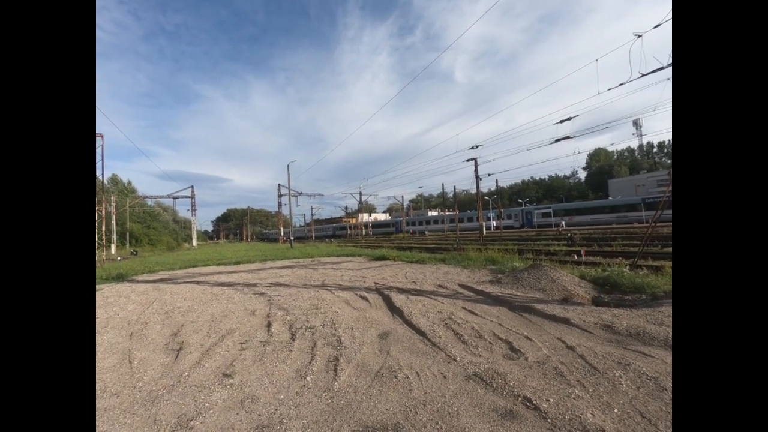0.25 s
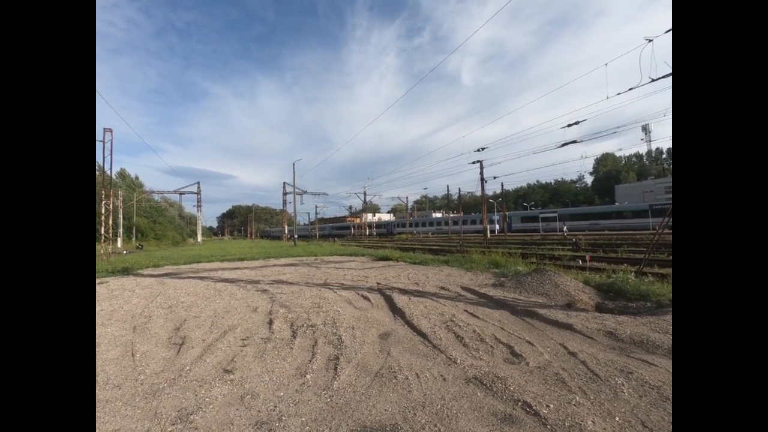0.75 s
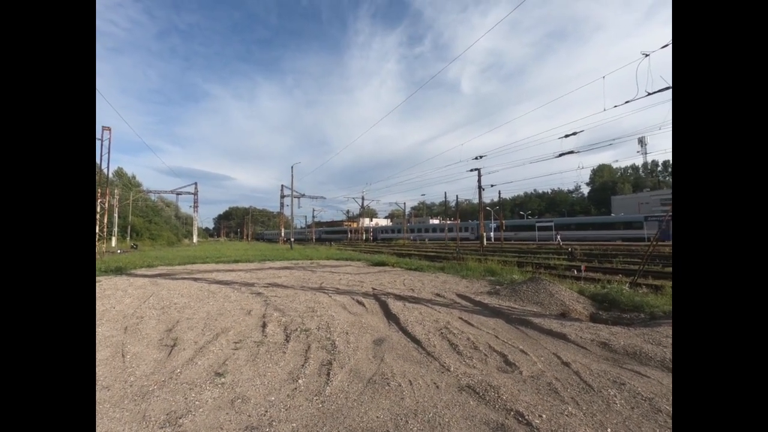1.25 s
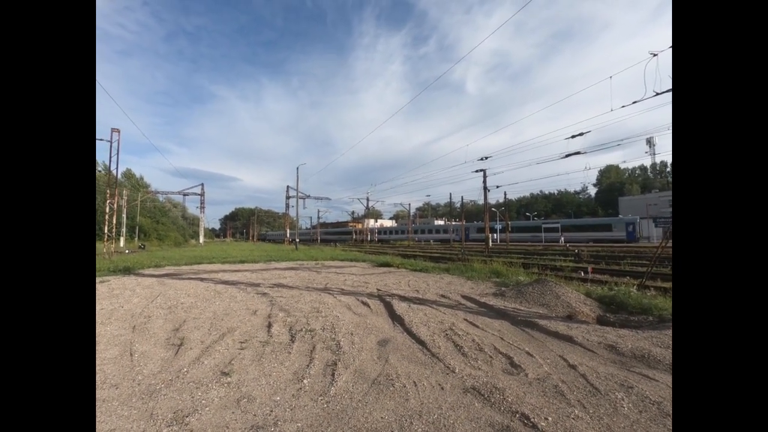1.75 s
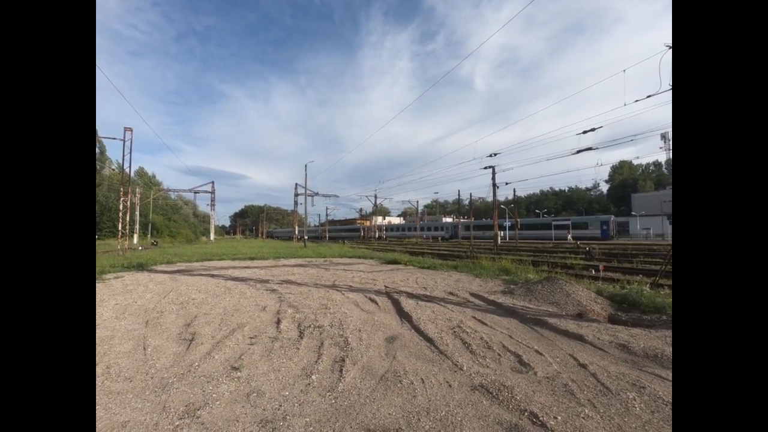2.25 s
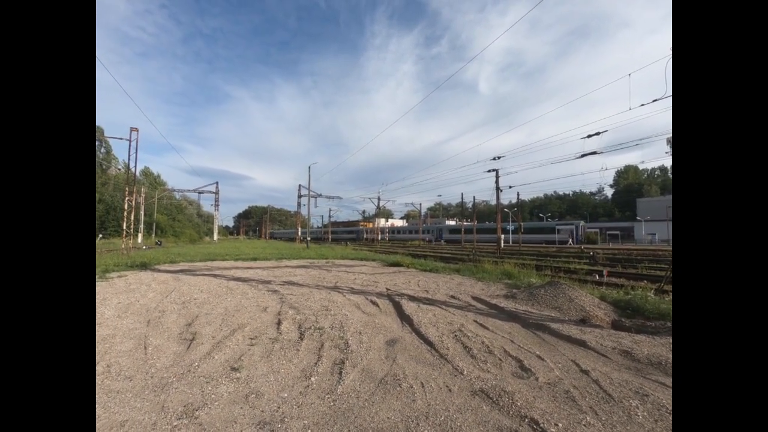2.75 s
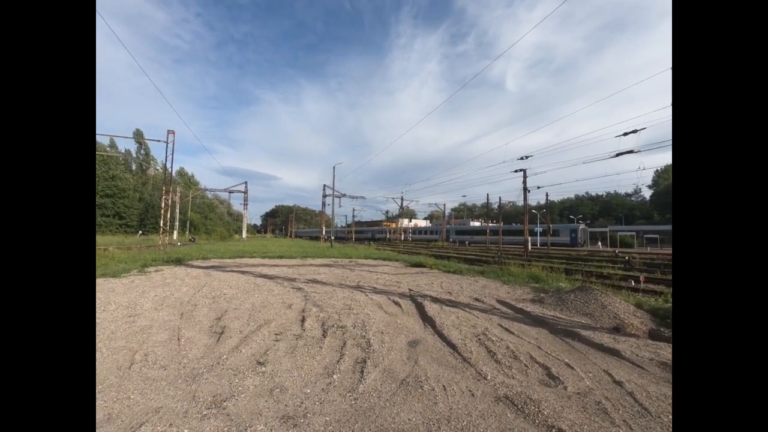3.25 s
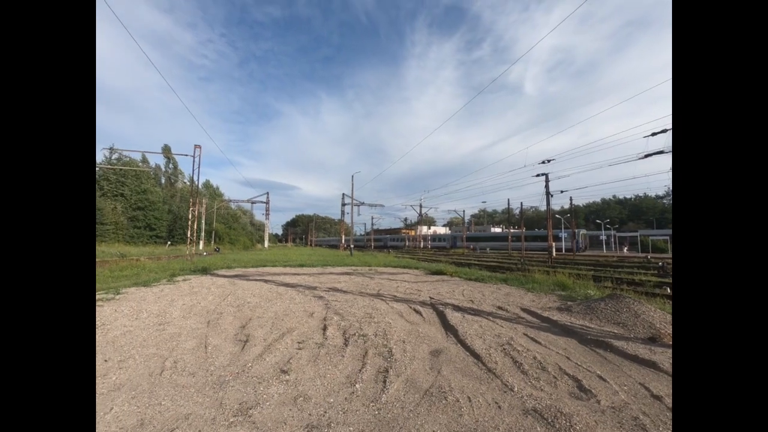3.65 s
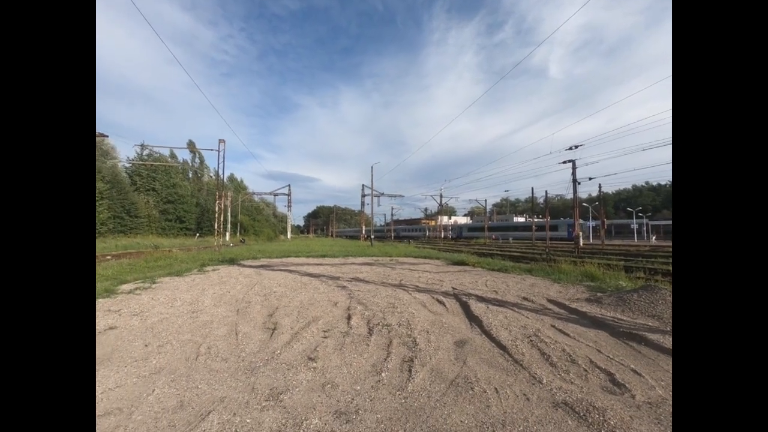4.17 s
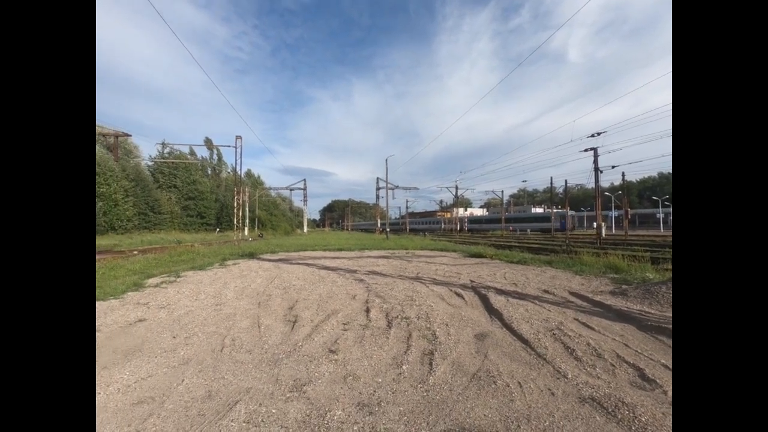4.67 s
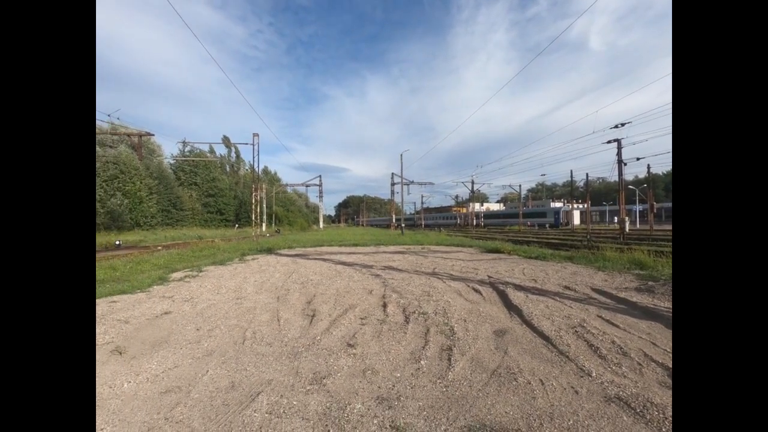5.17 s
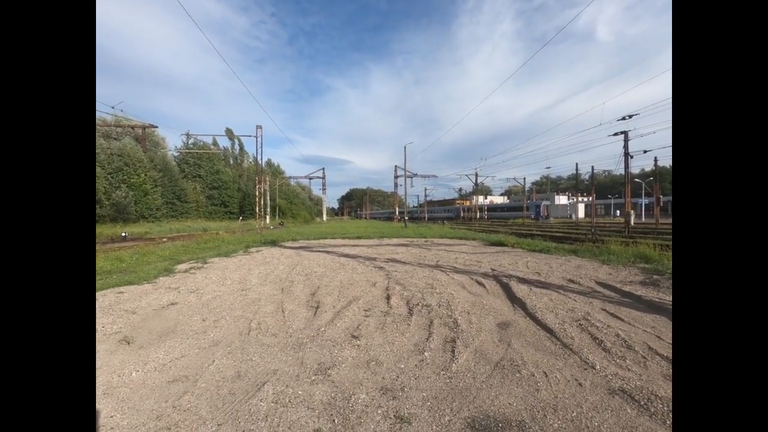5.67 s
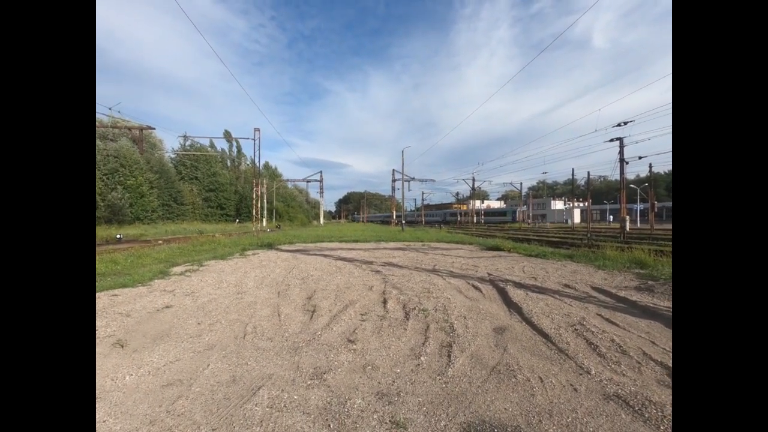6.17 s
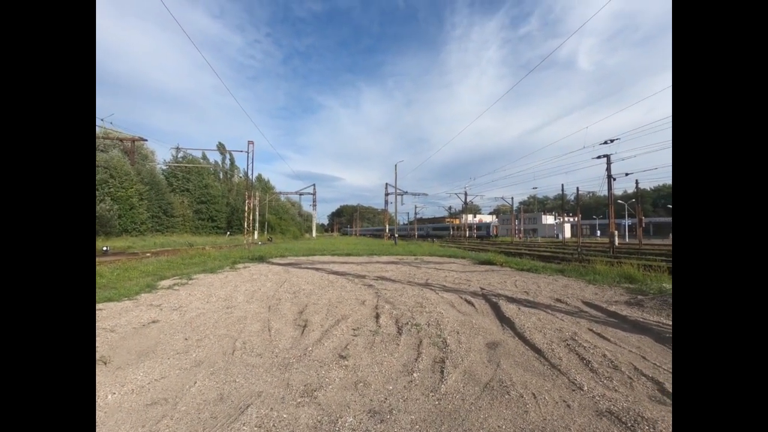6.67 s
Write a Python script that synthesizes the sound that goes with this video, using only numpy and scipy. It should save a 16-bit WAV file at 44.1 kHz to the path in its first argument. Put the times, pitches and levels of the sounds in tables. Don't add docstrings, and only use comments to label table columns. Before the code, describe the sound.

Low wind thumps over a faint far train: steady steel rolling, motor hum, joint knocks, then bright flange squeals and a loud click on the camera.

```python
import sys
import numpy as np
from scipy import signal
from scipy.fft import rfft, irfft, next_fast_len
from scipy.io import wavfile
from scipy.ndimage import map_coordinates

SR = 44100
rng = np.random.default_rng(int(sys.argv[2]) if len(sys.argv) > 2 else 0)


def master(y):
    cut = np.clip(np.atleast_2d(y).T, -1, 1)
    pcm = np.round(cut * 32767)
    wavfile.write(sys.argv[1], SR, pcm.astype(np.int16))


def linear_from_db(decibels):
    return 10 ** (np.asarray(decibels, float) / 20)


N = 305172


def unit(x):
    return x / np.sqrt(np.mean(x ** 2) + 1e-20)


def along(points, hz):
    f, *cols = np.transpose(points)
    return np.squeeze([np.interp(np.log(hz + 1), np.log(f + 1), c) for c in cols])


def curves(rows):
    s, *cols = np.vstack(rows).T
    return [np.interp(np.arange(N) / SR, s, c) for c in cols]


def span(start_s, held_s, attack_s):
    t = np.arange(N) / SR - start_s
    return np.maximum(t, 0), np.clip(t / attack_s, 0, 1), np.maximum(t - held_s, 0)


def wobble(rate_hz, size=N):
    knots = N * rate_hz / SR
    coarse = map_coordinates(rng.standard_normal(int(knots) + 4), [np.linspace(0, knots, 5000)])
    return np.interp(np.linspace(0, 4999, size), np.arange(5000), coarse)


def filtered(x, response):
    m = next_fast_len(N + SR // 2)
    return irfft(rfft(x, m) * response(np.fft.rfftfreq(m, 1 / SR)), m)[..., :N]


def noise(spectrum):
    return unit(filtered(rng.standard_normal((2, N)), lambda hz: linear_from_db(along(spectrum, hz))))


def tone(hz, drift):
    return 2 * np.pi * np.cumsum(hz * (1 + drift * wobble(25.1))) / SR


# f/Hz, width/Hz, rolling level/dB, rubbing level/dB
WHEEL_MODES = [(832, 385, 0, -37.5), (1578, 410, -0.5, -19.5), (2300, 370, 0, -5.5), (2766, 24, 4.5, -9.5),
               (3291, 147, -3, -2.5), (4137, 43, -23, 1), (5080, 24, -26, -3.5), (5780, 25, -8, -5),
               (6010, 200, -21, -4), (6820, 310, -14, -7.5), (7760, 80, -29, -3.5), (8760, 150, -58, -14),
               (9700, 71, -47, -14.5), (10000, 170, -51, -31), (13350, 200, -80, -27.5)]


def singing(levels_db, between, between_db, flicker_db, rate_hz):
    hz, t, z = signal.stft(rng.standard_normal((2, N)), SR, nperseg=2048, noverlap=1536)
    power = linear_from_db(2 * (along(between, hz) + between_db))[:, None] * np.ones(len(t))
    for (centre_hz, width_hz, *_), db in zip(WHEEL_MODES, levels_db):
        shape = 1 / (1 + (2 * (hz - centre_hz) / width_hz) ** 2) ** 2
        swell_db = flicker_db * wobble(rate_hz, size=len(t))
        power += np.outer(shape, linear_from_db(2.76 * (db + swell_db)))
    return signal.istft(z * np.sqrt(power), SR, nperseg=2048, noverlap=1536)[1][:, :N]


# t/s, rolling level/dB
NEARNESS = [(0.0, -50), (0.17, -52.5), (1.58, -55), (2.1, -54), (2.68, -54), (2.95, -52.5), (3.39, -55),
            (4.28, -55.5), (4.61, -57), (5.05, -52.5), (5.2, -58), (5.49, -60.5), (6.69, -58.5),
            (6.92, -53.5)]
# f/Hz, density/(dB per Hz)
RAIL_BED = [(260, -7), (450, -3.5), (520, -11.5), (650, -9), (850, -14), (1120, -9), (1610, -10),
            (2270, -9), (3290, -5.5), (4830, -20), (7570, -19.5), (9000, -34.5), (10700, -41),
            (14500, -71.5)]
# f/Hz, density/(dB per Hz)
RUMBLE_COLOUR = [(44, -35), (75, 0), (155, -0.5), (182, -7.5), (243, -8), (351, -20.5), (419, -20),
                 (700, -49), (910, -88), (1540, -120)]
RUMBLE_DB, RUMBLE_GROWS, ROAR_DB, HISS_DB = -37.5, 1, 0, -1.5


def rolling():
    near_db, = curves(NEARNESS)
    steel = singing([row[2] for row in WHEEL_MODES], RAIL_BED, between_db=3, flicker_db=.9, rate_hz=9)
    roar = filtered(steel, lambda hz: 1 / (1 + (hz / 1900) ** 6))
    swell_db = near_db + 0.55 * wobble(9)
    rumble_db = RUMBLE_DB + RUMBLE_GROWS * (near_db - near_db.mean()) + 1.3 * wobble(6.5)
    rumble = linear_from_db(rumble_db) * noise(RUMBLE_COLOUR)
    return rumble + linear_from_db(ROAR_DB + swell_db) * unit(roar) + linear_from_db(HISS_DB + swell_db) * unit(steel - roar)


# t/s, hum level/dB
EFFORT = [(0, -36), (.3, -45), (.55, -37), (.8, -56), (1.4, -47), (1.65, -41.5), (2.25, -41), (2.4, -36.5),
          (2.9, -33), (3.17, -37), (3.25, -48.5), (3.6, -65)]
# f/Hz, level/dB
GEAR_TONES = [(419.3, -56), (438, -60.5)]
HUM_HZ, HUM_RISE_HZ_PER_S = 145.5, 4.2
HUM_SECOND_DB, HUM_SECOND_FADE_DB_PER_S = -49, 3
GEAR_SAG_HZ_PER_S, GEAR_FADE_DB_PER_S, GEAR_OFF_S = 2.5, .5, 3.26
WHISTLE_HZ, WHISTLE_SECOND_DB = 3666, -9
WHISTLE_DB, WHISTLE_HOLD_S, WHISTLE_FADE_DB_PER_S = -62.5, .3, 4


def motors():
    t = np.arange(N) / SR
    since_off = np.maximum(t - GEAR_OFF_S, 0)
    hum_db, = curves(EFFORT)
    hum_second_db = HUM_SECOND_DB - HUM_SECOND_FADE_DB_PER_S * t - 30 * since_off
    whistle_db = WHISTLE_DB - WHISTLE_FADE_DB_PER_S * np.maximum(t - WHISTLE_HOLD_S, 0)
    whistle_second_db = whistle_db + WHISTLE_SECOND_DB - 30 * np.maximum(t - .9, 0)
    hum = (HUM_HZ + HUM_RISE_HZ_PER_S * t, .003, hum_db, hum_second_db)
    whistle = (WHISTLE_HZ, .0016, whistle_db, whistle_second_db)
    out = np.zeros(N)
    for hz, drift, *levels_db in (hum, whistle):
        phase = tone(hz, drift)
        for order, db in enumerate(levels_db, 1):
            swell_db = (1.3 + 1.2 * (order - 1)) * wobble(8)
            out += linear_from_db(db + 2.5 + swell_db) * np.sin(order * phase)
    gear_db = -GEAR_FADE_DB_PER_S * t - 120 * since_off
    for hz, db in GEAR_TONES:
        level = linear_from_db(db + gear_db + 3 + 2.2 * wobble(6))
        out += level * np.sin(tone(hz - GEAR_SAG_HZ_PER_S * t, .004))
    return out


# t/s, strength/dB, left against right/dB
WIND_STRENGTH = [
    [(0.0, -27.5, -8), (0.22, -30, -7), (0.62, -31.5, -12), (0.71, -31, -19), (0.94, -31, -11.5),
     (2.75, -29.5, -6), (3.39, -26.5, -16), (3.52, -32, -9.5), (4.28, -24, -5.5), (4.42, -30.5, -6.5),
     (5.15, -17.5, -11.5), (5.21, -20.5, -22), (5.49, -22, -14), (5.55, -22, -7.5)],
    [(5.62, -29.5, -7), (5.724, -21.5, -11), (5.88, -31.5, -9), (6.92, -21.5, -2.5)],
]
# f/Hz, density/(dB per Hz)
BUFFET_COLOUR = [(30, -4), (50, 1.5), (80, -2), (120, -5.5), (200, -26), (400, -83.5)]
# f/Hz, density/(dB per Hz)
HEAVE_COLOUR = [(2, -30), (9, 15.5), (18, 21), (40, 11), (60, 16.5), (100, -60)]
# f/Hz, density/(dB per Hz)
FLUTTER_COLOUR = [(60, 5.5), (150, 6), (250, 5), (400, -8), (700, -24), (1200, -81.5)]
# t/s, half width/s, level/dB
FLUTTER_GUSTS = [(2.1, 0.19, -35), (5.19, 0.048, -28), (5.263, 0.013, -28), (5.41, 0.069, -32),
                 (6.48, 0.051, -45), (6.92, 0.055, -36)]
# t/s, peak level/dB, f/Hz
PORT_EDDIES = [
    [(.12, -14.5, 110), (.163, -15, 74), (.21, -14, 86.4), (.238, -13, 87.5), (.27, -16, 60),
     (.35, -18, 35.8), (.387, -15.5, 36.4), (.703, -17.5, 29.5), (.78, -18, 33.4), (1.478, -19, 97.5),
     (1.55, -20.5, 40), (4.87, -14, 34), (4.95, -14, 42.2), (5.08, -14.5, 29.3), (5.162, -21.5, 485),
     (5.166, -13, 149), (5.181, -16, 330), (5.191, -23, 276), (5.263, -14.5, 60), (5.136, -25, 300),
     (5.161, -30, 800), (5.214, -21, 260), (5.244, -27, 270), (5.263, -22, 380), (5.289, -28, 260),
     (5.347, -28, 330), (5.381, -24, 300), (5.388, -33, 600), (5.431, -27, 330), (5.46, -27, 250),
     (5.49, -29, 230), (5.3, -28, 220), (5.338, -25, 295), (5.385, -26, 335), (5.414, -16, 300),
     (5.731, -37, 108), (6.34, -29, 180), (6.42, -31, 170), (2.2, -30, 205), (2.3, -30, 200),
     (5.545, -27, 240), (6.571, -22, 198), (6.568, -29, 574), (6.73, -24.5, 194)],
    [(6.255, -27, 110), (6.298, -22, 110), (6.512, -24, 199), (6.535, -27, 190), (6.59, -25, 168),
     (6.87, -19.5, 201), (6.895, -31, 397), (5.172, -28, 400), (5.198, -28, 300), (5.27, -32, 300),
     (5.345, -33, 320), (5.405, -28, 350), (6.495, -24, 195), (6.44, -31, 200), (6.57, -37, 800),
     (6.8, -24, 160), (6.885, -20, 160), (6.91, -22, 170)],
]
# t/s, peak level/dB, f/Hz
LOW_PORT_EDDIES = [
    [(0.501, -22, 70.4), (0.864, -19, 49), (1.137, -26.5, 73), (1.85, -21.5, 98), (2.189, -24, 75),
     (2.406, -14.5, 99), (2.783, -17.5, 86.5), (2.853, -21.5, 96), (2.939, -18.5, 113), (3.042, -22.4, 80),
     (3.099, -28, 54), (3.216, -23.5, 60), (3.292, -19.2, 43), (3.356, -17, 57), (3.434, -21, 70),
     (3.648, -21, 82), (3.736, -21.6, 59.4), (3.855, -27, 55), (3.936, -16.5, 69), (4.19, -24, 52),
     (4.246, -14.5, 94), (4.559, -21.5, 76.6), (4.615, -18, 62), (4.758, -18, 81), (4.983, -18, 55),
     (5.316, -19, 54.5), (5.382, -20, 102), (5.434, -15.5, 65), (5.494, -20, 54.7), (5.673, -24, 66),
     (5.729, -17, 69), (6.245, -23.5, 70.5), (6.343, -20, 63), (6.417, -21.5, 49.7), (6.513, -31, 69),
     (6.579, -18.5, 88), (6.686, -15, 52), (6.751, -13, 66), (6.827, -19.5, 49), (6.879, -19, 64)],
    [(0.085, -33, 106), (2.07, -38, 83), (2.293, -34, 121), (3.333, -26, 110), (5.028, -21, 49),
     (5.441, -27.5, 46), (5.646, -29, 81), (5.812, -28, 80.6), (5.864, -31, 83), (5.931, -26, 104),
     (6.105, -30.3, 87.6), (6.503, -20, 101), (6.595, -20.5, 132), (6.66, -15, 109), (6.765, -19, 100),
     (6.896, -12.5, 133)],
]
BUFFET_DB, HEAVE_DB, FLUTTER_DB = 0, -4, -25.5
DEEP_HZ, DEEP_LEFT_DB = 55, -14


def wind():
    level_db, pan_db = curves(WIND_STRENGTH)
    share = linear_from_db([np.clip(1.6 * (pan_db + 3), -30, 6), -np.clip(pan_db + 3, 0, 20)])
    lumps = linear_from_db(2.2 * np.array([wobble(11), wobble(9)]))
    seconds = np.arange(N) / SR
    gusts = sum(linear_from_db(db) * np.exp(-((seconds - s) / width_s) ** 2) for s, width_s, db in FLUTTER_GUSTS)
    gusty = (linear_from_db(level_db + FLUTTER_DB) + gusts) * linear_from_db(3 * wobble(45))
    air = linear_from_db(level_db + BUFFET_DB) * unit(lumps * noise(BUFFET_COLOUR))
    air = air + linear_from_db(level_db + HEAVE_DB) * noise(HEAVE_COLOUR)
    air = air + gusty * noise(FLUTTER_COLOUR)
    deep = filtered(air, lambda hz: 1 / (1 + (hz / DEEP_HZ) ** 6))
    deep_share = np.minimum(share, linear_from_db([[DEEP_LEFT_DB], [0]]))
    air = np.pad(share * (air - deep) + deep_share * deep, ((0, 0), (0, 2000)))
    t = np.arange(-2000, 2000) / SR
    for port, rows in zip((1, 0, 1, 0), PORT_EDDIES + LOW_PORT_EDDIES):
        for s, db, hz in rows:
            u = 2 * np.pi * hz * t
            pulse = (1 - u - u ** 2 / 2) * np.exp(-u ** 2 / 5)
            air[port, round(s * SR) - 2000:][:len(t)] += linear_from_db(db) * pulse
    return air[:, :N]


def leak(air):
    def crossing(hz):
        return 0.19 / (1 + (hz / 200) ** 4) - 0.2 / (1 + (260 / (hz + 1)) ** 4)
    across = filtered(air[::-1], crossing)
    return filtered(air + across, lambda hz: 1j * hz / (4 + 1j * hz))


# t/s, held/s, level/dB
TOP_HISSES = [
    (3.83, .2, -82),
    (4.68, .45, -79),
    (6.82, .2, -83),
    (0, .2, -92),
    (3.02, .2, -93),
]


def air_hiss():
    gain = 0
    for start_s, held_s, db in TOP_HISSES:
        _, rise, after = span(start_s, held_s, .03)
        gain = gain + rise * linear_from_db(db - 70 * after)
    return gain * noise([(10400, -60), (11000, 0), (13000, -4), (14500, -9), (15200, -60)])


# t/s, held/s, level/dB, fade/(dB per s)
FLANGE_RUBS = [(.08, 0.044, -58.5, 61), (1.95, .04, -63, 81), (2.1, 0.043, -62.5, 67),
               (2.25, 0.039, -64, 62), (2.39, 0.037, -59, 118), (2.82, 0.2, -54.5, 23),
               (3.66, 0.057, -62, 75), (3.813, 0.37, -49, 29.5), (4.669, 0.49, -51, 30.5),
               (5.3, 0.41, -67, 310), (5.735, 0.12, -57.5, 31), (5.9, 0.43, -61.5, 51),
               (6.745, .3, -53, 50)]
# f/Hz, density/(dB per Hz)
RUB_BED = [(1800, -20), (3000, -4), (4000, -7), (5500, -7), (7800, -6.5), (8400, -12), (10800, -24),
           (11100, -41), (12800, -45), (13700, -34.5), (15000, -67)]
RUB_ATTACK_S, RUB_SAG_DB_PER_S = 0.048, 4
GRAZE_DB = -8.5
TOP_DB, TOP_GROWS = -7.5, 0.99


def flanges():
    power = linear_from_db(2 * (curves(NEARNESS)[0] + GRAZE_DB))
    for start_s, held_s, db, fade in FLANGE_RUBS:
        since, rise, after = span(start_s, held_s, RUB_ATTACK_S)
        rub_db = db - RUB_SAG_DB_PER_S * np.minimum(since, held_s) - fade * after
        power = power + (rise * linear_from_db(rub_db)) ** 2
    level_db = 10 * np.log10(power)
    steel = singing([row[3] for row in WHEEL_MODES], RUB_BED, between_db=-6, flicker_db=1.5, rate_hz=10)
    top = filtered(steel, lambda hz: 1 / (1 + (8300 / (hz + 1)) ** 12))
    grip = linear_from_db(level_db - 1 + .9 * np.minimum(level_db + 59, 0) + 1.2 * wobble(120))
    return grip * (unit(steel - top) + linear_from_db(TOP_DB + TOP_GROWS * (level_db + 50.5)) * unit(top))


# t/s, peak level/dB, loudest mode f/Hz, t60/s, thud level/dB
RAIL_JOINTS = [
    (.088, -36, 3320, .06, -34),
    (1.415, -48, 4200, .03, -44),
    (1.962, -41, 3150, .07, -42),
    (2.103, -41, 754, .13, -36),
    (2.155, -45, 2320, .06, -48),
    (2.258, -46, 3194, .12, -24),
    (2.396, -35, 2800, .055, -17),
    (3.135, -44, 2770, .05, -30),
    (4.97, -47, 2300, .08, -50),
]


def joints():
    out, t = np.zeros(N + SR), np.arange(SR // 3) / SR
    modes = np.array(WHEEL_MODES)
    hz, width_hz, roll_db, rub_db = (modes[:, i:i + 1] for i in range(4))
    highpass = signal.butter(3, 4200, fs=SR, output='sos')
    for s, db, loud_hz, t60_s, thud_db in RAIL_JOINTS:
        chance = rng.standard_normal((2, len(modes), 1))
        levels_db = np.maximum(roll_db, rub_db - 10) - 8 + 6 * np.log10(width_hz / 250) + 3 * chance[0]
        ring = np.sum(linear_from_db(levels_db) * np.sin(2 * np.pi * hz * (1 + 0.0058 * chance[1]) * t), 0)
        crack = signal.sosfilt(highpass, rng.standard_normal(len(t)))
        ring += 1.05 * np.sin(2 * np.pi * loud_hz * t + .1 * np.cumsum(crack)) + 1.8 * crack
        thud = linear_from_db(thud_db - 60 * t / 0.11) * np.sin(2 * np.pi * 120 * t)
        knock = (linear_from_db(db - 60 * t / t60_s) * ring + thud) * (1 - np.exp(-t / 0.005))
        out[round(s * SR):][:len(t)] += knock
    return out[:N]


# t/s, held/s, f/Hz, level/dB
LONE_MODES = [(4.3, 0.07, 4235, -57.5), (4.4, 0.068, 4235, -70), (4.355, .05, 2172, -54),
              (4.42, .05, 2172, -65), (3.85, 0.11, 5975, -61), (2.97, .27, 4170, -66),
              (2.95, .1, 7741, -64), (5.77, 0.46, 7760, -66), (6.0, 0.49, 3290, -65), (.3, .55, 7327, -71),
              (0.087, 0.32, 1580, -59), (6.78, .14, 6800, -61), (3.6, .3, 3500, -70),
              (6.79, .13, 5090, -63), (6.84, .08, 4180, -56), (2.9, .4, 6850, -67), (4.84, .3, 7747, -61),
              (3.88, .35, 13281, -78), (.9, .8, 3666, -70.5)]
# t/s, held/s, f/Hz, level/dB
ROUGH_RINGS = [(.09, .03, 2770, -57), (.09, .03, 2300, -57), (2.1, .07, 2300, -55), (2.115, .03, 2720, -57),
               (2.262, .035, 3170, -56), (2.265, .04, 2740, -59), (2.425, .008, 2790, -52),
               (2.86, .14, 10400, -77), (2.86, .14, 13600, -89), (5.59, .08, 6950, -73),
               (5.59, .05, 4200, -72), (6.12, .14, 5720, -69), (6.82, .1, 8400, -68), (6.8, .12, 6550, -63),
               (4.15, .08, 7780, -59), (3.86, .08, 6000, -55), (3.97, .07, 7800, -58),
               (3.92, .08, 4170, -60), (3.85, .12, 3290, -59), (1.96, .02, 3950, -58),
               (2.268, .03, 3450, -58), (2.398, .015, 2790, -49), (.09, .03, 3300, -55),
               (3.9, .15, 14000, -86), (6.77, .15, 3290, -58), (5.8, .18, 3290, -66), (4.72, .2, 3290, -61),
               (4.95, .2, 3290, -62), (5.2, .2, 4200, -68), (5.4, .15, 4200, -71), (4.75, .2, 5720, -65),
               (5.0, .2, 5720, -65), (5.1, .2, 6950, -69), (5.35, .15, 6950, -75), (2.92, .12, 6850, -66),
               (3.86, .15, 6900, -65), (6.38, .12, 6900, -73), (5.2, .15, 7790, -68),
               (2.15, .03, 2300, -57)]
# rise/s, fade/(dB per s), waver/Hz, waver rate/Hz
ROUGHNESS = (.006, 600, 70, 150)
CHIRP_RISE_S, CHIRP_FADE_DB_PER_S = 0.022, 250


def chirps(rows, rise_s, fade_db_per_s, waver_hz, rate_hz):
    out = np.zeros(N + SR)
    for start_s, held_s, hz, db in rows:
        t = np.arange(round((held_s + .2) * SR)) / SR
        knots = rng.standard_normal((2, 60))
        waver, swell = (np.interp(t * rate_hz, np.arange(60), k) for k in knots)
        level_db = db + 3 - fade_db_per_s * np.maximum(t - held_s, 0) + 2.5 * swell
        phase = 2 * np.pi * np.cumsum(hz + waver_hz * waver) / SR
        out[round(start_s * SR):][:len(t)] += np.minimum(t / rise_s, 1) * linear_from_db(level_db) * np.sin(phase)
    return out[:N]


# start t/s, end t/s, level/dB, favoured f/Hz, loss/(dB per octave away)
WHEEL_SQUEALS = [
    (2.9, 3.062, -65, 6200, 6),
    (3.839, 3.987, -58, 5460, 7),
    (4.03, 4.17, -55.5, 10200, 24),
    (4.278, 4.38, -70, 3300, 40),
    (4.38, 4.62, -77, 6000, 58),
    (4.717, 5.184, -64, 6600, 10),
    (5.249, 5.637, -74, 4870, 9),
    (6.02, 6.44, -70, 6360, 27),
    (6.801, 6.923, -60, 4000, 8),
]
# f/Hz, level/dB
LOCKED_MODES = [(3283, -9), (4150, 0), (5090, -10), (5725, -12), (6015, 0), (6890, -7), (7770, -1),
                (10718, -12), (13290, -24)]
WHEEL_PITCH = [.99, 1, 1.001, 1.02, 1.01, 1, 1.008, 1.002, .999]


def squeals():
    out = np.zeros(N)
    hz, mode_db = np.transpose(LOCKED_MODES)[:, :, None]
    for (start_s, end_s, db, favoured_hz, loss_db), ratio in zip(WHEEL_SQUEALS, WHEEL_PITCH):
        length_s = end_s - start_s + .1
        t = np.arange(min(round(length_s * SR), N - round(start_s * SR))) / SR
        knots = rng.standard_normal((2, len(LOCKED_MODES), 120))
        waver, swell = (np.array([np.interp(t * 60, np.arange(120), k) for k in rows]) for rows in knots)
        shape = np.minimum(t / .012, 1) * np.clip((length_s - t) / .12, 0, 1)
        phase = 2 * np.pi * np.cumsum(ratio * hz + .008 * hz * waver, axis=1) / SR
        away_db = loss_db * np.abs(np.log2(hz / favoured_hz))
        levels_db = db + mode_db - away_db + 5.5 + 2.8 * swell
        out[round(start_s * SR):][:len(t)] += shape * np.sum(linear_from_db(levels_db) * np.sin(phase), axis=0)
    return out


# t/s, click level/dB, ring level/dB, ring f/Hz, tick level/dB, tick f/Hz
CASE_TAP = (5.5779, -3.7, -15, 2720, -17, 9200)


def tap():
    s, click_db, ring_db, ring_hz, tick_db, tick_hz = CASE_TAP
    ms = 1000 * (np.arange(N) / SR - s)

    def bump(centre_ms, width_ms):
        return np.exp(-((ms - centre_ms) / width_ms) ** 2)

    def ring(db, hz, start_ms, t60_ms):
        gate = (ms < 2.6) * (ms > start_ms)
        return gate * linear_from_db(db - 60 * np.abs(ms) / t60_ms) * np.sin(2 * np.pi * hz * (ms - start_ms) / 1000)

    falling = bump(.03, .12)
    rising = .35 * np.exp(-np.abs(ms - .03) / .4) + .6 * bump(.03, .14)
    click = np.where(ms < .03, rising, falling) - .55 * bump(.75, .5)
    push = 1.15 * bump(2.5, 1.3) - .72 * bump(6.8, 2.7)
    left = -ring(ring_db, ring_hz, .06, 6) + ring(tick_db + 2, tick_hz, .08, 1.2)
    left = left - .17 * bump(.1, .1) + .12 * bump(2.9, 1.5)
    right = linear_from_db(click_db) * (click + push)
    right = right - ring(ring_db + 3, ring_hz, .13, 3.8) - ring(tick_db + 6, .74 * tick_hz, .1, .95)
    return filtered(np.array([left, right]), lambda hz: 1 / (1 + (hz / 10500) ** 8))


# f/Hz, t60/s
YARD_T60 = [(200, 0.34), (2000, 0.43), (10000, 0.19)]


def yard(x):
    hz, t, z = signal.stft(rng.standard_normal((2, SR // 2)), SR, nperseg=256)
    tail = signal.istft(z * linear_from_db(-60 * t / along(YARD_T60, hz)[:, None]), SR, nperseg=256)[1]
    wet = signal.fftconvolve(x[None], tail / np.linalg.norm(tail[0]), axes=1)[:, :N]
    return x * [[1], [.3]] + linear_from_db(-4.5) * wet


# f/Hz, left against right/dB, left lead/rad, likeness/(0-1)
PORT_PAIR = [(60, -5, .2, .9), (140, -3.5, .1, .85), (300, -6.5, 0, .9), (480, -7, .3, .7),
             (650, -6, 2, .55), (1000, -1.5, 1.9, .8), (1500, -4, 1.7, .7), (2300, -2, 1.5, .85),
             (3500, -3, .9, .75), (4600, -6, 0, .7), (6000, -8, -.6, .45), (7200, -5.5, -1.6, .55),
             (7900, -7, -1, .8), (9200, -6, -.1, .7), (10500, -2.5, 0, .65), (11200, -.5, 0, .9)]


def ports(pair):
    def spread(hz):
        balance_db, lead, alike = along(PORT_PAIR, hz)
        turn = np.arccos(np.clip(alike, 0, 1)) / 2
        left = linear_from_db(balance_db / 2) * np.exp(.5j * lead)
        right = linear_from_db(-balance_db / 2) * np.exp(-.5j * lead)
        mix = np.array([[np.cos(turn), np.sin(turn)], [np.cos(turn), -np.sin(turn)]])
        parts = np.array([left, right])[:, None] * mix
        return parts / np.sqrt(np.sum(np.abs(parts.mean(0)) ** 2, 0))
    return filtered(pair, spread).sum(1)


def scene():
    common = np.array([[1], [.3]])
    lone = chirps(LONE_MODES, CHIRP_RISE_S, CHIRP_FADE_DB_PER_S, waver_hz=32, rate_hz=60)
    rough = chirps(ROUGH_RINGS, *ROUGHNESS)
    steady = (motors() + lone + rough) * common
    train = rolling() + flanges() + air_hiss() + steady + yard(joints() + squeals())
    return ports(train) + leak(wind() + tap())


def low_pass(x):
    return signal.sosfilt(signal.butter(12, 15070, fs=SR, output="sos"), x)


def record(dry):
    return low_pass(dry)


dry = scene()
out = record(dry)
master(out)
```